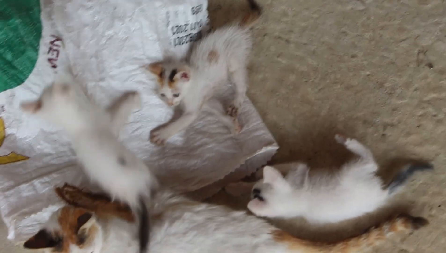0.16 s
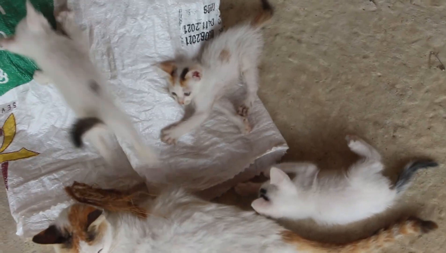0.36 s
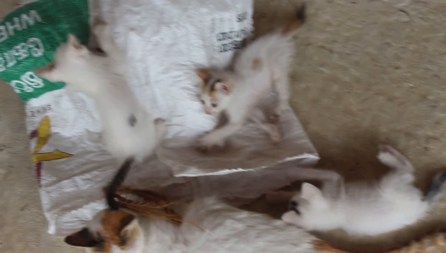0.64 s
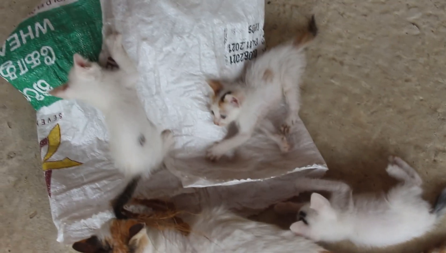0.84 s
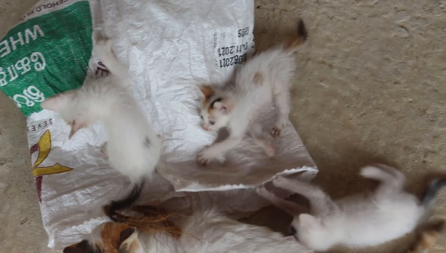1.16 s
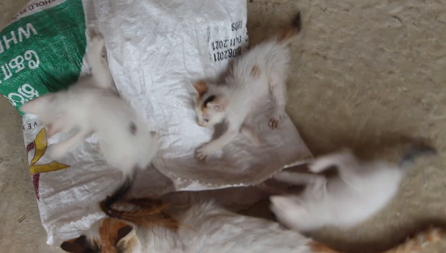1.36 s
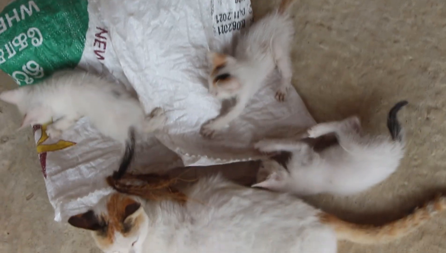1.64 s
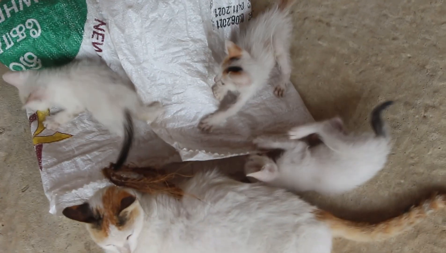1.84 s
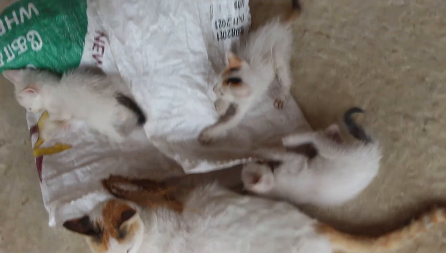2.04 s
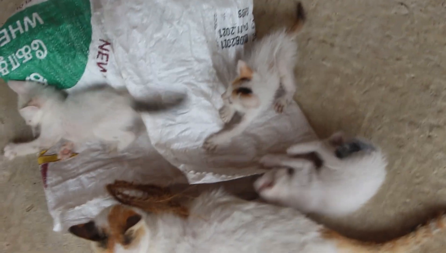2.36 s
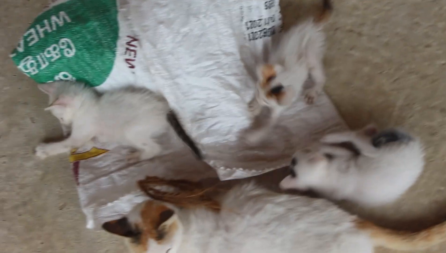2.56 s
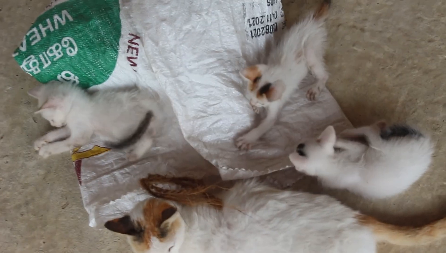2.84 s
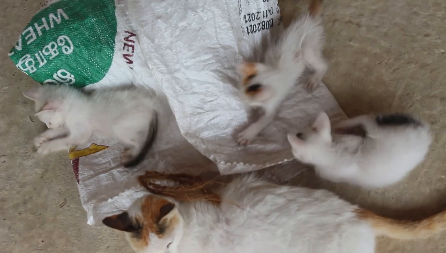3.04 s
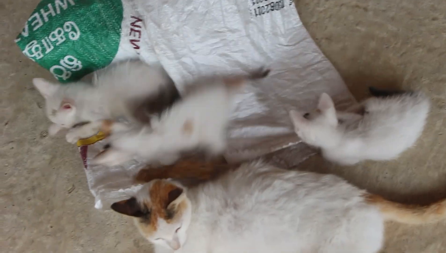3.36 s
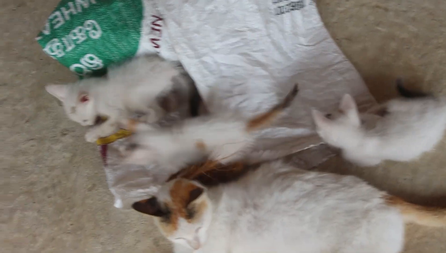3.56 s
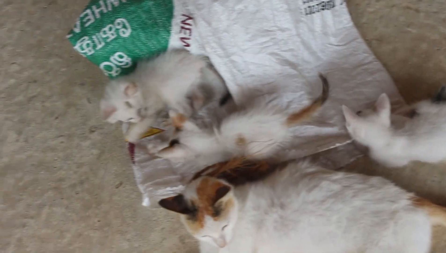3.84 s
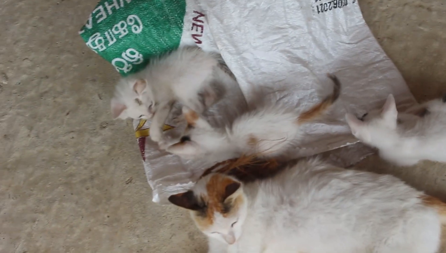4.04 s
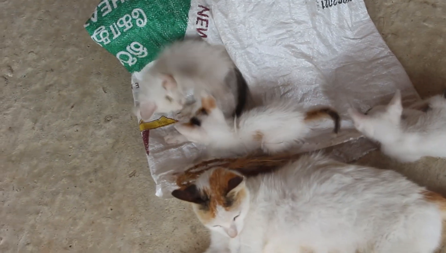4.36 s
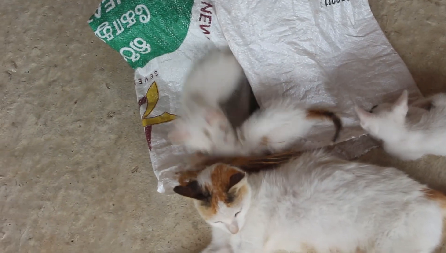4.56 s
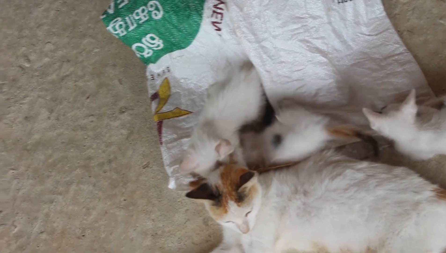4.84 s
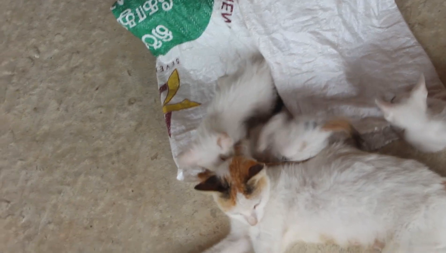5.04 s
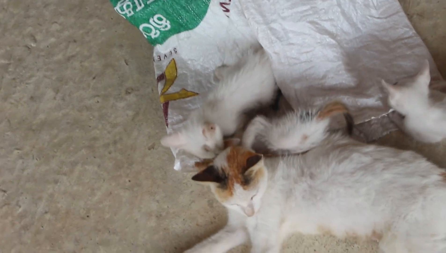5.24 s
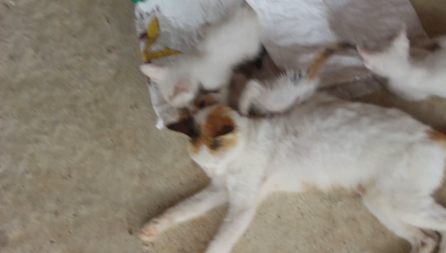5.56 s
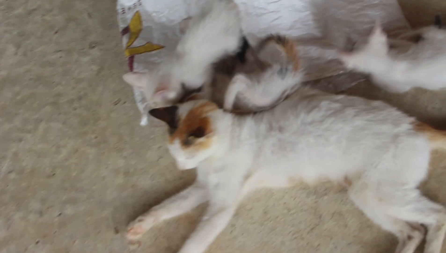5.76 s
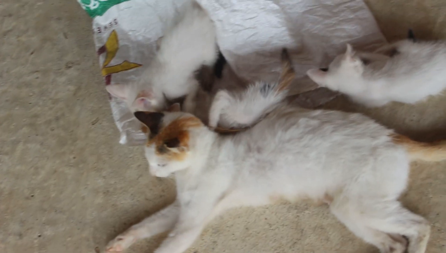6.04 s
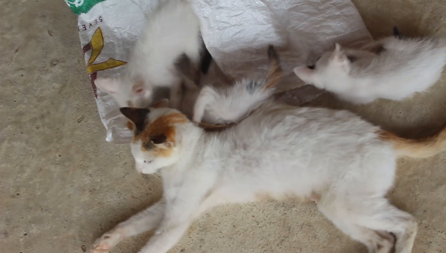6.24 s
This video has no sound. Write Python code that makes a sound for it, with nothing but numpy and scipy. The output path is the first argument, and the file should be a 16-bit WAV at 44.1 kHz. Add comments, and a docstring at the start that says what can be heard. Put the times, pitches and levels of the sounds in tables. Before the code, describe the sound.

Kittens scuffle on a crackling woven plastic sack with sharp snaps, while two birds call steadily outside; one small high mew at the end.

```python
"""A small hard room, with a yard outside: kittens scuffle on a woven plastic sack and one mews near the end.
The sack crackles with clumps of filtered clicks and snaps with short damped rings; claws squeak as narrow noise.
The mew is pulses and breath through throat resonances. Outside, one bird rolls short groups of falling
near-sine notes and another whistles upward on a gliding sine; both echo off walls.
Far insects hiss as narrow bands of noise over a soft bed of hum and hiss."""
import sys
import numpy as np
from scipy import signal
from scipy.io import wavfile
from scipy.ndimage import uniform_filter1d

SR = 44100
rng = np.random.default_rng(int(sys.argv[2]) if len(sys.argv) > 2 else 0)


def unload_wav(signal):
    """Save mono or channel-first audio to the path in sys.argv[1] as 16-bit WAV at rate SR, clipped to [-1, 1]."""
    wavfile.write(
        sys.argv[1],
        SR,
        np.round(np.clip(np.atleast_2d(signal).T, -1, 1) * 32767).astype(np.int16),
    )


N = 282240  # length in samples

# Far hum and hiss, spectral tilt: f/Hz, relative level/dB
AIR_SPECTRUM = [(25, -35), (50, -1.5), (130, -6), (210, -2), (400, -10), (700, -9), (1000, -5),
                (1500, -9.5), (3000, -19), (5900, -22), (8400, -21), (11000, -31.5), (16000, -35)]
# How alike the far air is in both ears: f/Hz, likeness (0 to 1)
AIR_LIKENESS = [(60, 0.2), (300, 0.063), (1000, 0.29), (3000, 0.022), (15000, .01)]
# Steady narrow noise, two insect bands and a low hum: f/Hz, width of each filter pass/Hz, level/dB
STEADY_BANDS = [(7026, 730, -58.5), (9780, 1200, -70), (214.5, 20.7, -62)]
# Crease sizes of the sack as bands of crackle: f/Hz, width/Hz, relative level/dB
CREASES = [(1110, 1700, 0.5), (1710, 1180, 0.5), (2960, 1620, 2), (4560, 1930, -2.5), (5850, 2700, -4.5)]
# A paw lands on or drags over the sack: peak t/s, crackle level/dB, swell t/s, fade t/s,
# rumble level/dB, claw hiss level/dB
PAWS = [(0.01, -44, 0.013, 0.027, -70, -52), (0.25, -47, 0.42, 0.18, -52, -66),
        (0.3, -41, .006, 0.036, -34.5, -42.5), (0.371, -38, 0.014, 0.15, -39.5, -54),
        (0.411, -44.5, 0.015, 0.12, -38, -47), (0.61, -45, 0.23, 0.086, -45.5, -57),
        (0.647, -45.5, 0.0055, .05, -40, -49), (0.697, -46, 0.0065, 0.052, -36.5, -64),
        (1.125, -50, .02, 0.11, -63, -66), (1.175, -51, 0.026, 0.1, -67, -58.5),
        (1.367, -51.5, 0.011, 0.33, -46.5, -60), (1.505, -43.5, 0.013, .17, -40.5, -54),
        (1.655, -39, 0.011, 0.058, -52, -67), (1.86, -54.5, 0.16, 0.7, -50.5, -62),
        (1.99, -74, 0.026, 0.19, -52, -58.5), (2.29, -50.5, 0.13, 0.16, -57, -60),
        (2.64, -32, 0.0034, 0.022, -41, -66), (2.66, -45.5, 0.041, .13, -63, -62),
        (2.81, -45, 0.089, 0.15, -50, -65), (3.14, -51, 0.13, 0.34, -54, -64),
        (3.29, -45, 0.18, 0.057, -54, -56.5), (3.37, -51, 0.24, 0.062, -43.5, -62),
        (3.41, -42, 0.069, 0.029, -60, -52), (3.465, -41.5, 0.14, 0.11, -49.5, -53),
        (3.64, -43.5, 0.14, 0.12, -68, -50.5), (3.7, -48.5, 0.081, 0.21, -61, -59),
        (3.97, -53, .15, 0.37, -49.5, -72), (4.26, -47.5, 0.095, 0.24, -55, -63),
        (4.369, -42.5, 0.065, 0.058, -68, -50), (4.44, -44.5, .05, 0.043, -56, -56),
        (4.498, -39.5, 0.0085, 0.14, -56, -59), (4.54, -40.5, 0.057, 0.078, -50, -54),
        (4.774, -34.5, .003, 0.033, -61, -55), (4.81, -48.5, .04, 0.21, -68, -66),
        (5.09, -49, 0.048, .09, -66, -60), (5.35, -55.5, 0.011, 0.06, -70, -72),
        (5.64, -59, 0.31, .09, -57, -75), (5.7, -62, .02, 0.72, -66, -69)]
# Small stirring between the paws: t/s, crackle level/dB
STIRRING = [(0, -60), (.8, -56.5), (1.2, -60.5), (2.5, -54.5), (3, -56), (3.9, -77), (4.7, -59.5), (5, -59),
            (5.3, -62), (5.95, -58), (6.1, -75)]
# Rolling bird, one row a roll: strongest note t/s, its level before distance/dB, lead-in step t/s,
# gap between strong notes t/s, f/Hz, closing note level before distance/dB
ROLLS = [(0.147, -23, .054, .062, 915, -58), (0.814, -23.5, .051, .060, 915, -38.5),
         (1.477, -25, .051, .071, 916, -56), (2.158, -25.5, .047, .073, 920, -56),
         (2.874, -26.5, .072, .065, 928, -33.5), (3.584, -27.5, .042, .077, 918, -34),
         (4.291, -29, .04, .066, 925, -35), (4.978, -27.5, .04, .076, 926, -33),
         (5.712, -29.5, .042, .063, 917, -33.5), (6.42, -30, .041, .065, 915, -35)]
# Shape of one rolled note: t/s, pitch (share of the note's f), relative level/dB
NOTE_SHAPE = [(0, 1.01, -24), (.008, 1.01, -9), (.018, 1.006, 0), (.026, 1, -2), (.034, .975, -7.5),
              (.05, .94, -7), (.08, .9, -20)]
# Notes leading up to the strongest: level relative to it/dB, pitch (share of the roll's f)
LEAD_IN = [(-14.5, 0.91), (-7, 0.95), (-9, 0.91)]
# Whistling bird, one row a call: top of the rise t/s, peak level before distance/dB, top f/Hz
WHISTLES = [(0.1766, -35.5, 1320), (0.853, -36.5, 1297), (1.51, -39.5, 1333), (2.1184, -37.5, 1320),
            (2.7856, -37, 1321), (3.4131, -37, 1309), (4.0274, -35.5, 1312), (4.6375, -37, 1326),
            (5.2817, -35.5, 1311), (5.916, -39.5, 1293)]
# Shape of a whistle: t from the top/s, pitch (share of top f), relative level/dB
WHISTLE_SHAPE = [(-.08, .72, -25), (-.065, .72, -6), (-.035, .74, -7), (-.018, .84, -17), (0, 1, -3),
                 (.012, 1.006, 0), (.035, .995, -3), (.06, .98, -6), (.085, .965, -11), (.1, .96, -30)]
# Single snaps of a crease: t/s, ring level/dB, ring f/Hz, low push level/dB, bright tick level/dB,
# left over right level/dB
SNAPS = [(0.2947, -31, 6100, -49, -35, 1), (0.3008, -19, 3200, -30, -30, 2),
         (0.4089, -33, 2300, -35, -39, -1), (0.4172, -30, 2300, -38, -38, 1),
         (0.4468, -29, 1900, -41, -44, 0), (0.6459, -32, 2300, -40, -40, 2),
         (0.6966, -33, 1900, -37, -46, 1), (0.7036, -34, 2900, -37, -47, -1),
         (1.1734, -37, 2300, -51, -54, -3), (1.2574, -35, 2500, -57, -52, 0),
         (1.3673, -39, 2300, -44, -44, 0), (1.4258, -39, 2300, -45, -38, 3),
         (1.5052, -36, 2300, -37, -36, 2), (1.651, -23, 2300, -48, -45, -1),
         (1.8699, -39, 5400, -48, -40, 1), (1.9884, -39, 3000, -46, -51, 1),
         (2.0169, -38, 2100, -51, -52, 1), (2.5682, -39, 3400, -55, -43, -5),
         (2.6139, -36, 3800, -64, -54, -3), (2.6396, -18, 2500, -41, -39, -2),
         (3.1065, -37, 6500, -53, -42, 3), (3.2174, -30, 2800, -50, -54, -1),
         (3.2787, -25, 2500, -43, -40, -1), (3.3473, -36, 2500, -47, -52, 1),
         (3.4034, -33, 2300, -47, -43, 1), (3.6377, -30, 2700, -47, -41, 1),
         (3.7684, -33, 4200, -47, -42, -4), (4.3698, -26, 2700, -54, -46, -1),
         (4.4954, -29, 2200, -49, -54, 0), (4.6608, -38, 2300, -54, -47, -1),
         (4.7723, -21, 2600, -38, -45, 0), (5.0891, -30, 3500, -47, -42, -1),
         (5.116, -34, 2200, -50, -48, -1), (5.2288, -38, 2400, -50, -56, 2),
         (5.3588, -39, 2300, -66, -59, -1)]
# A claw slips along a strand: t/s, level/dB, f/Hz, width of each filter pass/Hz, length t/s
SQUEAKS = [(1.167, -59, 2600, 150, 0.14), (1.725, -46, 3600, 400, 0.012), (5.696, -55.5, 4330, 794, 0.028)]
# The mew: t/s, f/Hz, effort level/dB, mouth opening (factor on throat f), lowest tone level/dB
MEW = [(5.98, 868, -55, 0.93, -48), (6.032, 858, -45.5, 0.95, -53), (6.07, 1011, -43, 0.83, -41.5),
       (6.141, 1129, -41, 1, -44.5), (6.247, 866, -40, 0.75, -43), (6.306, 816.4, -45.5, 0.85, -40),
       (6.318, 768, -44.5, 0.83, -40), (6.345, 822, -47.5, 0.8, -42), (6.4, 710, -48.5, 0.76, -38.5)]
# Throat resonances at mouth factor 1: f/Hz, width of each filter pass/Hz, relative level/dB
THROAT = [(1900, 2700, 5.5), (4320, 1350, 13), (5620, 1580, 7.5)]
# Walls outside: f/Hz, t60/s
YARD = [(700, 1.48), (1000, 0.14), (1300, 0.93), (1800, 0.43)]
# The hard room: f/Hz, t60/s
ROOM = [(200, 0.17), (1000, 0.3), (3000, 0.33), (8000, 0.27), (15000, 0.31)]


def gain_of(db):
    """Decibels to amplitude."""
    return 10 ** (np.asarray(db) / 20)


def evened(x):
    """Brings a signal to an RMS of 1."""
    return x / np.sqrt(np.mean(x ** 2) + 1e-20)


def read(points, hz):
    """Reads a curve of (f, value) points along a log frequency axis."""
    f, value = np.transpose(points)
    return np.interp(np.log(hz + 1), np.log(f + 1), value)


def add(mix, s, sound):
    """Lays a sound into the mix at s seconds, cut at the mix's end."""
    part = mix[..., max(round(s * SR), 0):][..., :sound.shape[-1]]
    part += sound[..., :part.shape[-1]]


def panned(x, db):
    """Makes stereo with the left louder than the right by db."""
    return x * gain_of([[db / 2], [-db / 2]])


def resonate(x, hz, width):
    """Shifts hz down to zero, smooths, and shifts back: a resonance of gain 1."""
    turn = np.exp(2j * np.pi * np.cumsum(hz * np.ones(len(x))) / SR)
    r = np.exp(-np.pi * width / SR)
    smooth = signal.lfilter([1 - r], [1, -r], x / turn + 1e-18)
    return 2 * (turn * smooth).real


def resonate_twice(x, hz, width):
    """Two equal resonances in a row, for steeper skirts."""
    return resonate(resonate(x, hz, width), hz, width)


def band(x, lo_hz, hi_hz):
    """Band-pass between two edges."""
    return signal.sosfilt(signal.butter(2, [lo_hz, hi_hz], "band", fs=SR, output="sos"), x)


def flutter(db, count):
    """A gain that wavers at random by db RMS, smoothed twice over count samples."""
    slow = uniform_filter1d(uniform_filter1d(rng.standard_normal(N), count), count)
    return gain_of(db * evened(slow))


def air():
    """Far hum and hiss from random short-time spectra with faint patches, plus the steady narrow bands."""
    frames, hz = N // 256 + 5, np.fft.rfftfreq(1024, 1 / SR)
    a, b, c, d, patches = rng.standard_normal((frames, 513, 5)).T
    patches = evened(uniform_filter1d(uniform_filter1d(patches, size=12, axis=0), size=14, axis=1))
    same = np.clip(read(AIR_LIKENESS, hz), -1, 1)[:, None]
    left = a + 1j * b
    right = same * left + np.sqrt(1 - same ** 2) * (c + 1j * d)
    level_db = read(AIR_SPECTRUM, hz)[:, None] + 1.35 * patches
    spectra = np.array([left, right]) * gain_of(level_db)
    bed = signal.istft(spectra, nperseg=1024, noverlap=768)[1][:, :N]
    out = gain_of(-52) * evened(bed)
    for f, width, db in STEADY_BANDS:
        for ear in out:
            ear += gain_of(db) * evened(resonate_twice(rng.standard_normal(N), f, width))
    return out


def clicks(per_s, spread_db, likeness):
    """A sparse train of clicks, a few of them large, partly shared between left and right."""
    sizes = gain_of(spread_db * np.minimum(rng.exponential(1, (3, N)), 4))
    sizes = sizes * (rng.random((3, N)) < per_s / SR)
    shared, *own = sizes * rng.choice([-1., 1.], (3, N))
    return likeness * shared + (1 - likeness) * np.array(own)


def paw_levels(span_db=20, stir_rumble_db=-6, stir_claws_db=-21.5):
    """Gains of crackle, rumble and claw hiss: each paw swells and fades over the stirring, powers adding."""
    t = np.arange(0, N, 32) / SR
    layers_db = np.array([[0], [stir_rumble_db], [stir_claws_db]])  # relative to the stirring's crackle
    power = gain_of(np.interp(t, *np.transpose(STIRRING)) + layers_db) ** 2
    for s, db, swell_s, fade_s, low_db, high_db in PAWS:
        # 1 = one swell or fade time from the peak, where the paw is span_db down
        away = np.where(t < s, (s - t) / swell_s, (t - s) / fade_s)
        power = power + gain_of(np.array([[db], [low_db], [high_db]]) - span_db * away) ** 2
    return [np.interp(np.arange(N) / SR, t, np.sqrt(p)) for p in power]


def scuffle(clump_per_s=70, clump_s=.008, between=1.):
    """Creases of several sizes click in clumps; weight adds a low rumble and claws a thin hiss."""
    crackle_gain, weight_gain, claw_gain = paw_levels()
    starts = rng.random(N) * (rng.random(N) < clump_per_s / SR)
    bursts = signal.lfilter([1], [1, -np.exp(-1 / (clump_s * SR))], starts)  # sudden start, slow end
    clumps = evened(between + bursts)
    crackle = np.zeros((2, N))
    for hz, width, db in CREASES:
        crease = band(clicks(600, 3., 0.6), hz - width / 2, hz + width / 2)
        crackle += gain_of(db) * evened(crease)
    rumble = evened(band(band(clicks(900, 4.1, 0.5), 148, 1530), 58, 1600))
    claws = evened(band(clicks(1500, 2.6, 0.4), 4150, 11000))
    return (crackle_gain * evened(crackle) + weight_gain * rumble + claw_gain * claws) * clumps


def rolling_bird(octave_db=-23, note_lead_s=.013):
    """Rolls swell over near-sine notes, each a short strong peak with a softer tail that sinks in pitch."""
    out = np.zeros(N + SR)
    s_points, share, shape_db = np.transpose(NOTE_SHAPE)
    t = np.arange(0, s_points[-1], 1 / SR)
    share, shape_db = (uniform_filter1d(np.interp(t, s_points, c), size=200, mode="nearest")
                       for c in (share, shape_db))
    for s, db, step_s, gap_s, hz, closing_db in ROLLS:
        # three lead-in notes, the strongest, a second strong one, the closing one
        places = [-3.6 * step_s, -2 * step_s, -step_s, 0, gap_s, 1.9 * gap_s]
        notes = LEAD_IN + [(0, 1), (-.5, 1.005), (closing_db - db, 1)]
        for place, (relative_db, bend) in zip(places, notes):
            turns = np.cumsum(hz * bend * share) / SR
            octave = gain_of(octave_db) * np.sin(2 * np.pi * 2 * turns)
            tone = np.sin(2 * np.pi * turns) + octave
            if s + place > note_lead_s:  # notes starting before time zero are left out
                add(out, s + place - note_lead_s, gain_of(db + relative_db + shape_db) * tone)
    return out[:N]


def whistling_bird():
    """A gliding sine: a low start, a quick rise and a held top that fades."""
    out = np.zeros(N)
    s_points, share, shape_db = np.transpose(WHISTLE_SHAPE)
    t = np.arange(s_points[0], s_points[-1], 1 / SR)
    for s, db, hz in WHISTLES:
        turns = np.cumsum(hz * np.interp(t, s_points, share)) / SR
        loudness = gain_of(db + np.interp(t, s_points, shape_db))
        add(out, s + s_points[0], loudness * np.sin(2 * np.pi * turns))
    return out


def snaps(ring_s=.00028, push_hz=450, push_s=.0015, tick_hz=8800, tick_s=.00006):
    """A crease flips: a ring of one or two cycles, a dull push and a bright tick."""
    out, t = np.zeros((2, N)), np.arange(600) / SR
    push = np.exp(-t / push_s) * np.sin(2 * np.pi * push_hz * t)
    tick = t / tick_s * np.exp(1 - t / tick_s) * np.sin(2 * np.pi * tick_hz * t)
    for s, db, hz, low_db, high_db, pan_db in SNAPS:
        ring = np.exp(-t / ring_s) * np.sin(2 * np.pi * hz * t)
        snap = gain_of(db) * ring / ring.max()
        snap += gain_of(low_db) * push / push.max()
        snap += gain_of(high_db) * tick
        add(out, s, panned(snap, pan_db))
    return out


def squeaks():
    """Claws slipping along a strand: short thin puffs of noise in one narrow resonance."""
    out = np.zeros(N)
    for s, db, hz, width, length_s in SQUEAKS:
        noise = resonate_twice(rng.standard_normal(SR // 4), hz, width)
        progress = np.minimum(np.arange(len(noise)) / SR / length_s, 1)
        add(out, s, gain_of(db) * evened(noise) * np.sin(np.pi * progress))
    return out


def mew(rough=.36, jitter=.27, flutter_db=2.2):
    """Unsteady pulses and breath pass a throat that opens and shuts; the lowest tone hums on its own."""
    s, *columns = np.transpose(MEW)
    t = np.arange(s[0], s[-1], 1 / SR)
    hz, effort_db, mouth, hum_db = (np.interp(t, s, c) for c in columns)
    wander = uniform_filter1d(rng.standard_normal(len(t)), size=150)
    turns = np.cumsum(hz * (1 + jitter * wander)) / SR
    folds = sum(np.cos(2 * np.pi * k * turns) for k in range(2, 9))  # overtones only
    breath = (0.21 + np.exp(-(turns % 1) / 0.44)) * rng.standard_normal(len(t))  # puffs once a cycle
    drive = (1 - rough) * evened(folds) + rough * evened(breath)
    throat = np.zeros(len(t))
    for k, (f, width, db) in enumerate(THROAT):
        throat += (-1) ** k * gain_of(db) * resonate_twice(drive, f * mouth, width)  # signs alternate
    voice = gain_of(effort_db) * evened(throat * flutter(flutter_db, count=150)[:len(t)])
    hum = gain_of(hum_db) * flutter(2.0, count=200)[:len(t)] * np.cos(2 * np.pi * turns)
    out = np.zeros(N)
    add(out, s[0], (voice + hum) * np.minimum((t - s[0]) / 0.017, 1))  # 17 ms fade-in
    return out


def echoes(x, decays, gap_s, likeness):
    """Sparse taps of random sign, partly other ones for each ear, each band dying at its own speed."""
    taps = np.zeros((3, SR))
    at = np.arange(0, SR - 20, 20) + rng.integers(0, 20, (3, SR // 20 - 1))
    np.put_along_axis(taps, at, rng.choice([-1., 1.], at.shape), 1)
    taps = likeness * taps[2] + (1 - likeness) * taps[:2]
    taps = taps * (np.arange(SR) > gap_s * SR)  # silence before the first echo
    hz, t, z = signal.stft(taps, SR, nperseg=256)
    fade = gain_of(-60 * t / read(decays, hz)[:, None])
    tail = signal.istft(z * fade, SR, nperseg=256)[1]
    return signal.fftconvolve(x, tail / np.linalg.norm(tail[0]), axes=1)[:, :N]


def scene():
    """Places the birds in the yard and the kittens close by, puts all of them in the room, and adds the air."""
    roll, whistle = panned(rolling_bird(), -3.4), panned(whistling_bird(), -0.46)
    roll[0] = np.roll(roll[0], 2)  # left ear two samples late: the rolling bird sits to the right
    voice, hits, paws = panned(mew(), 0.61), snaps(), scuffle() + squeaks()
    birds = roll + whistle
    direct = gain_of(-2) * birds * flutter(2.4, count=200)  # moving air makes far sounds waver
    outside = direct + echoes(gain_of(-7) * birds, YARD, .015, .6)
    near = outside + paws + hits + voice
    wet = gain_of(-6) * outside + gain_of(-9) * paws + gain_of(-1) * hits + gain_of(-3) * voice
    return near + echoes(wet, ROOM, 0.0024, 0.5) + air()


def record(dry):
    """The microphone loses the deepest bass, below 45 Hz; then a band limit cuts the top at 15.8 kHz."""
    thin = signal.sosfilt(signal.butter(3, 45, "high", fs=SR, output="sos"), dry)
    limit = signal.firwin(511, 15800, window=("kaiser", 9), fs=SR)
    return signal.oaconvolve(thin, limit[None], "same")


dry = scene()
out = record(dry)
unload_wav(out)
```